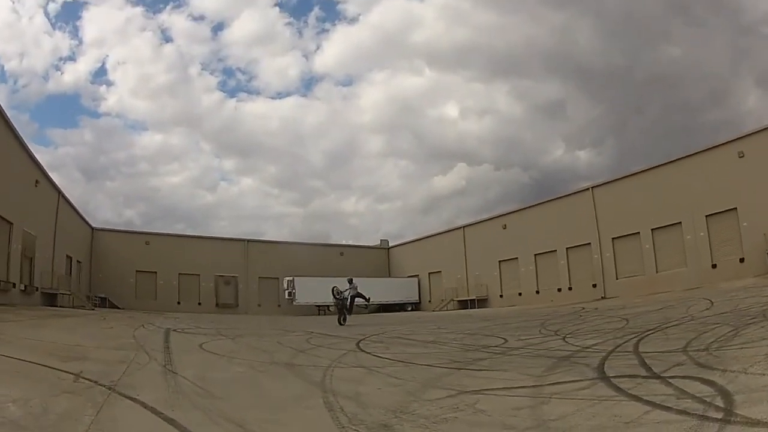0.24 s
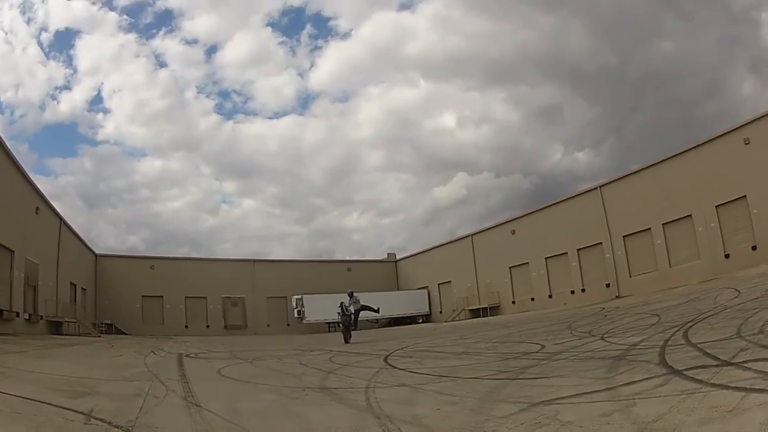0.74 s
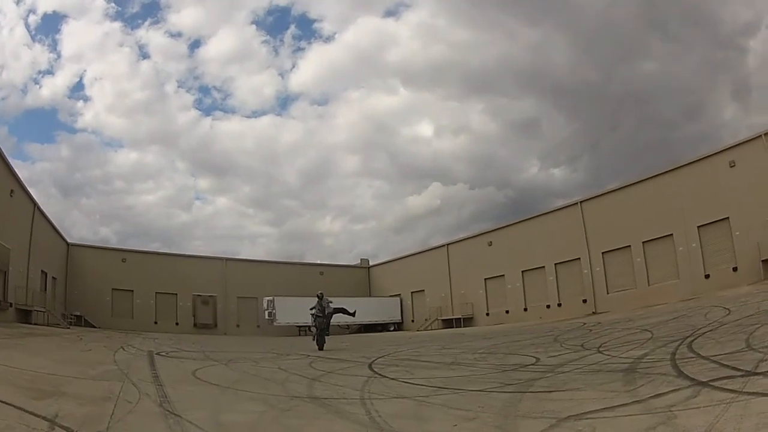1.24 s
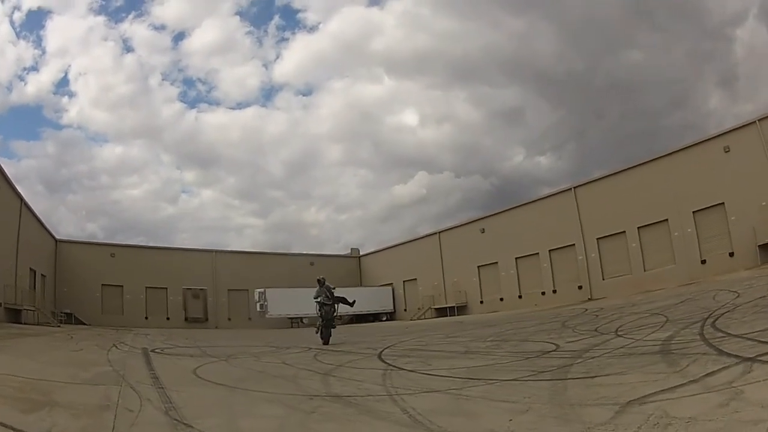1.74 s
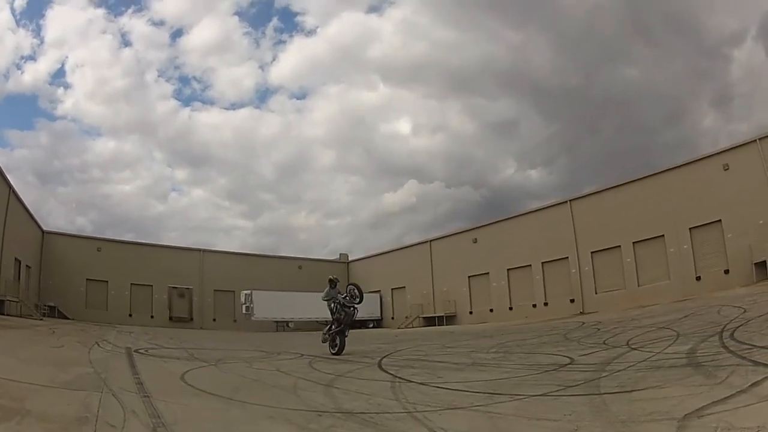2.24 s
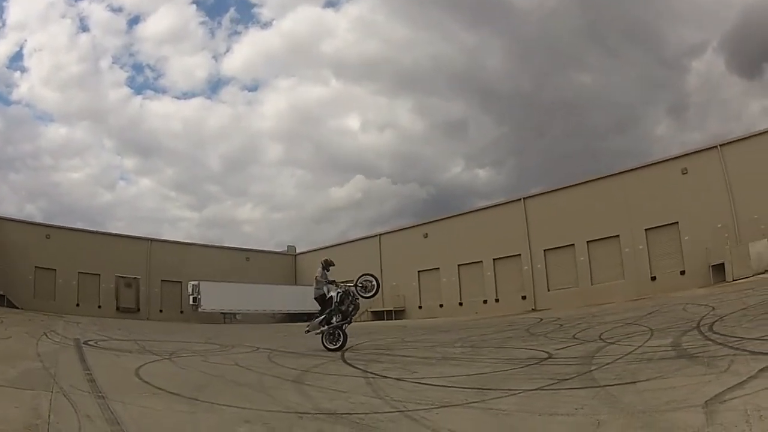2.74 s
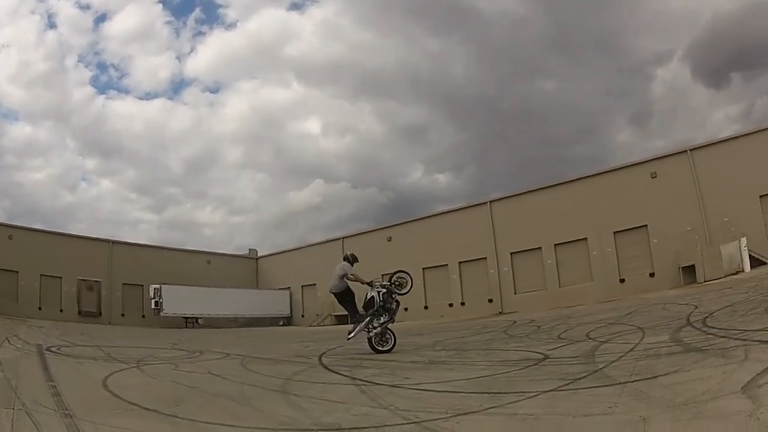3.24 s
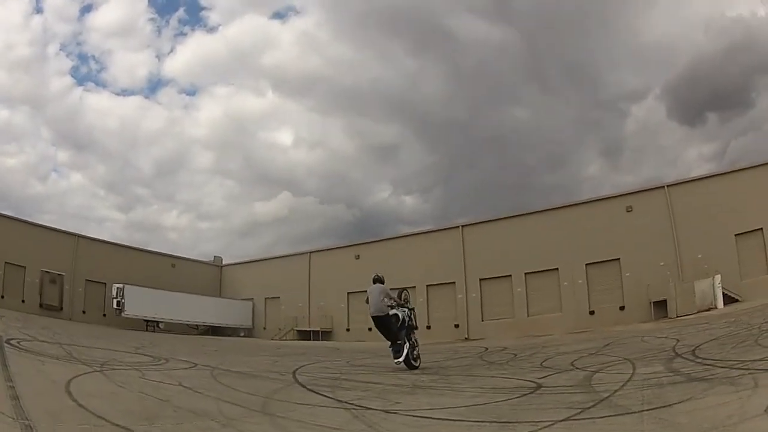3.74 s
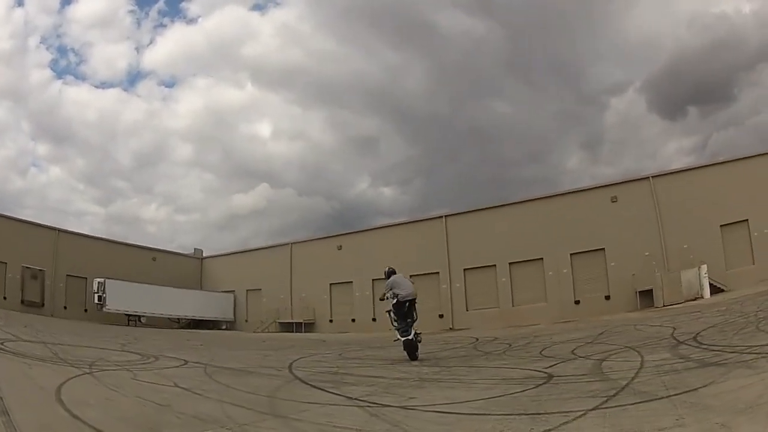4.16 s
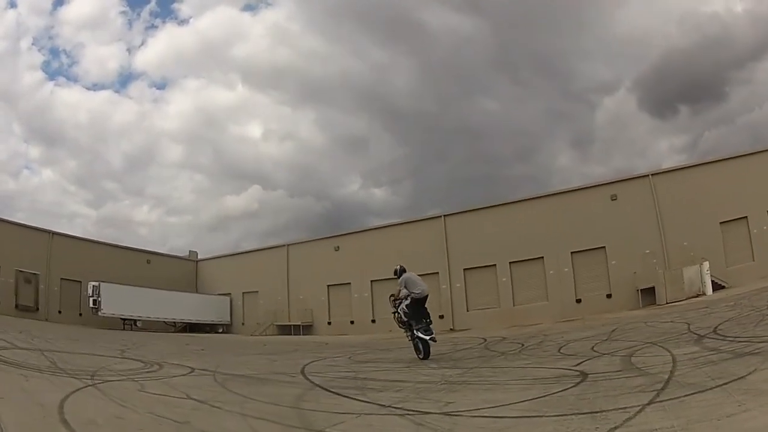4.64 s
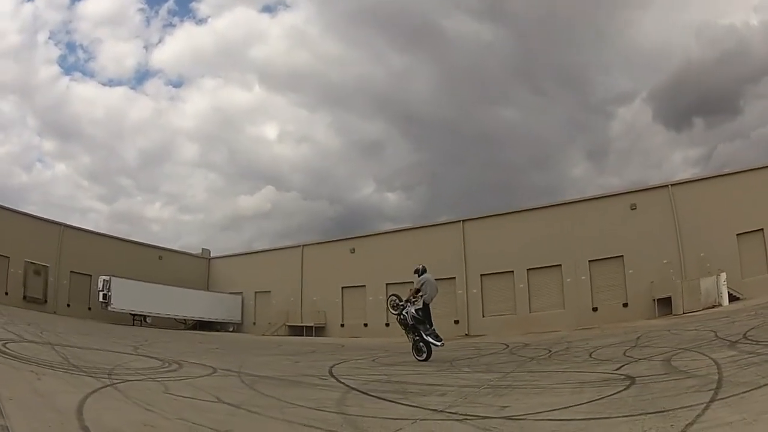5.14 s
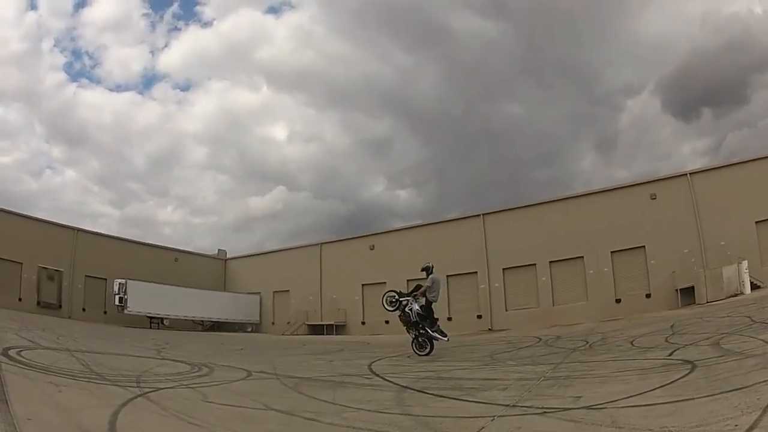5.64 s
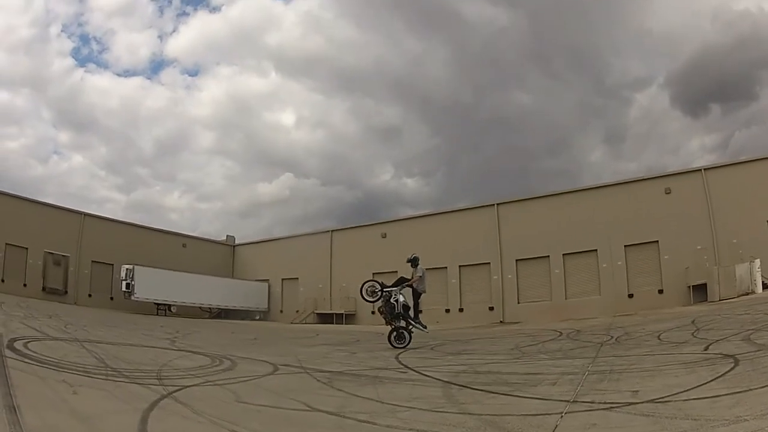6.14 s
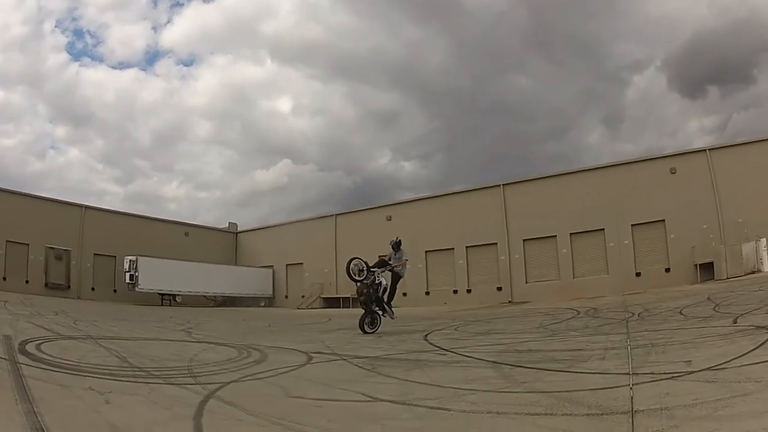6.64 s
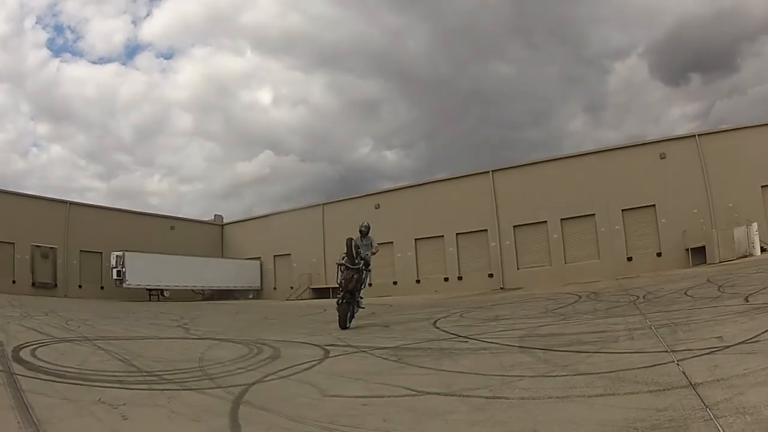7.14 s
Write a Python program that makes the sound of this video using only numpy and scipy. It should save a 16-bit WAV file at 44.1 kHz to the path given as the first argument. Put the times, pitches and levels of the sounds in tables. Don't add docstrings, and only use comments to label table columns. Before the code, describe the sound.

A single-cylinder motorcycle is already running at moderately high revs, its exhaust a fast, low, slightly ragged thump. It sags at once, then climbs from about 0.3 to 1.2 seconds, with shorter blips until another peak near 2.2. Revs drop, and a strong pull from 2.6 to 3.1 brings the loudest, closest bark, briefly clipping around 2.8-2.9. Another blip follows, then a high-revving climb until 4.2. The engine falls to slow, distinct thumps near 4.5, with lower surges around 5.1 and 5.7, a longer rise to 6.5, and short blips to the end near 7.4. Concrete walls return slaps and roughly a second of reverberation. Faint clatter, wavering gear whine and ringing covers accompany steady distant rumble. Tiny grit snaps at 4.8, 5.7, 6.1 and 6.9 are barely noticeable. The encased camera microphone sounds boxy and coarse, with weak treble.

```python
import sys
import numpy as np
from scipy import signal
from scipy.io import wavfile
from scipy.ndimage import uniform_filter1d, minimum_filter1d

SR = 44100
rng = np.random.default_rng(int(sys.argv[2]) if len(sys.argv) > 2 else 0)


def log_audio(samples):
    frames = np.atleast_2d(samples).T
    limited = np.clip(frames, -1, 1)
    pcm = np.round(limited * 32767).astype(np.int16)
    wavfile.write(sys.argv[1], SR, pcm)


def volts_from_db(level):
    exponent = np.asarray(level, float) / 20
    return 10 ** exponent


N = 326340
T = np.arange(N) / SR


def evened(x):
    return x / np.sqrt(np.mean(x ** 2) + 1e-20)


def steady(x, size=6000):
    power = uniform_filter1d(uniform_filter1d(x ** 2, size), size)
    return x / np.sqrt(abs(power) + 1e-12)


def read(points, hz):
    f, value = np.transpose(points)
    return np.interp(np.log(hz + 1), np.log(f + 1), value)


def columns(rows):
    s, *rest = np.transpose(rows)
    return [np.interp(T, s, c) for c in rest]


def colour(x, points, lag=1):
    hz = abs(np.fft.fftfreq(16384, 1 / SR))
    gain = np.log(volts_from_db(np.maximum(read(points, hz), -100)))
    phase = -lag * signal.hilbert(gain).imag
    taps = np.fft.ifft(np.exp(gain + 1j * phase)).real
    return signal.oaconvolve(x, np.roll(taps, 8192))[8192:][:N]


def whistle(hz, width):
    r = np.exp(-np.pi * width / SR)
    noise = rng.standard_normal(N) + 1j * rng.standard_normal(N)
    slow = signal.lfilter([1], [1, -r], noise)
    return evened((slow * np.exp(2j * np.pi * np.cumsum(hz) / SR)).real)


def beating(db):
    rates_hz = np.geomspace(5 / 4, 5 * 1.7, num=12)
    return db * evened(sum(np.sin(2 * np.pi * (f * T + rng.random())) for f in rates_hz))


# hz, level_db (per Hz)
ROAD_SPECTRUM = [(8, -74), (30, -26.5), (55, -7), (100, -5), (200, -4), (380, -8), (480, -22.5), (800, -22),
                 (1200, -74)]


def rumble():
    return volts_from_db(-23.5) * evened(colour(rng.standard_normal(N), ROAD_SPECTRUM))


# delay_s, level_db
WALL_SLAPS = [(.045, -13.5), (0.089, -11), (.15, -5), (0.223, -5)]
# hz, t60_s
YARD_DECAY = [(60, 0.88), (200, 1), (500, 0.75), (2000, 0.65)]


def yard(x):
    out = np.zeros(N)
    source = x - x[0] * np.exp(-T / .01)
    for delay, db in WALL_SLAPS:
        wander_s = 0.00313 * (1 + np.sin(2 * np.pi * (rng.uniform(0.0944, 0.26) * T + rng.random())))
        out += volts_from_db(db) * np.interp(T - delay - wander_s, T, source)
    for k in range(3):
        taps = np.zeros(SR)
        at = np.arange(1500, SR - 20, 20)
        taps[at + rng.integers(0, 20, len(at))] = rng.choice([-1., 1.], len(at))
        hz, t, z = signal.stft(taps, SR, nperseg=1024)
        fade = volts_from_db(-60 * t / read(YARD_DECAY, hz)[:, None])
        tail = signal.istft(z * fade, SR, nperseg=1024)[1]
        turn = np.sqrt(2 / 3) * np.cos(np.pi * (0.707 * T + k / 3))
        out += volts_from_db(-0.5) * signal.oaconvolve(x * turn, tail / np.linalg.norm(tail))[:N]
    return out


# start_s, level_db (peak)
GRIT_SNAPS = [
    (4.8472, -68.5),
    (5.6903, -72),
    (6.1164, -62),
    (6.8997, -61.5),
]


def grit():
    out, t = np.zeros(N), np.arange(500) / SR
    for s, db in GRIT_SNAPS:
        decay = volts_from_db(db + 28.0 - 60 * t / 0.022)
        out[round(s * SR):][:500] += decay * rng.standard_normal(500)
    return colour(out, [(500, -32), (1500, 14), (3000, 9.0), (5500, 1.5), (6000, -25), (7000, -87)])


# start_s, loudness_db, pipe_mouth_turned_db, engine_side_seen_db
CIRCLE_PATH = [(0.06, -21, -2.5, -57), (0.28, -29, -2.5, -56.5), (0.91, -20, 0.0, -54),
               (2.07, -19.5, 5, -50.5), (2.27, -11.5, -4, -48.5), (2.47, -19.5, -1, -53),
               (2.98, -9.5, 0.0, -47.5), (4.32, -14.5, 1, -56), (4.54, -25.5, -1.5, -58.5),
               (5.07, -14.5, -3, -53.5), (5.47, -27.5, -1, -56.5), (5.66, -18.5, -1, -52.5),
               (5.94, -21.5, -5, -54.5), (6.3, -16.5, 7, -52), (6.73, -20, -2, -51), (6.95, -18, 7, -50.5),
               (7.24, -18, -1, -51), (7.34, -18, 9, -46.5)]


def circling():
    return columns(CIRCLE_PATH)


# hz, level_db (per Hz)
CASE_SPECTRUM = [(530, -5), (900, -2.5), (1080, -7.5), (1180, -6.5), (2280, -10), (2730, -22.5),
                 (2840, -17), (4140, -24), (5160, -27), (5900, -36), (7670, -74), (13000, -120)]


def casing_clatter(turns):
    seen = circling()[2]
    side = seen - seen.mean()
    pulse = 1 + 0.64 * np.exp(-(turns % 1) / 0.36)
    noise = colour(rng.standard_normal(N) * pulse, CASE_SPECTRUM)
    dull = signal.sosfiltfilt(signal.butter(4, 2650, fs=SR, output="sos"), noise)
    bright = noise - dull
    return volts_from_db(-42.5 + 0.093 * side) * evened(dull) + volts_from_db(-0.14 + seen) * evened(bright)


# teeth_per_firing, level_db, width_hz
GEAR_TEETH = [(43.5, 6, 68), (22.97, 6, 130)]
# hz, level_db
WHINE_SPECTRUM = [(1200, -16), (1800, 1), (2600, -5), (3000, 6), (3600, 2.5), (4000, -12.5), (5000, -30)]
# start_s, level_db
COVER_TURN = [(0, -1), (1.9, -4.5), (2.2, 4), (2.6, -5.5), (3.6, 5), (3.8, -15), (5.6, -1.5), (6.2, -2),
              (6.5, 3), (6.8, -10), (7.4, 9)]
# delay_s, level_db
FAR_WALLS = [(.16, -5), (.31, -7)]


def gear_whine(hz):
    teeth = sum(volts_from_db(db) * whistle(count * hz, width) for count, db, width in GEAR_TEETH)
    speed_db = 0.0445 * (hz - hz.mean())
    level_db = -65 + columns(COVER_TURN)[0] + speed_db + beating(2)
    whine = volts_from_db(level_db) * colour(teeth, WHINE_SPECTRUM)
    late = sum(volts_from_db(db) * np.interp(T - delay, T, whine) for delay, db in FAR_WALLS)
    return whine + late


# pitch_hz, level_db, width_hz
COVER_MODES = [(2910, -8.5, 190), (3380, -8.5, 16), (2124, -0.5, 75)]


def cover_ring():
    seen = circling()[2]
    ring = sum(volts_from_db(db) * whistle(np.full(N, f), width) for f, db, width in COVER_MODES)
    return volts_from_db(-58 + .3 * (seen - seen.mean())) * ring


# opened_s, low_hz (firings per s there), shut_s, top_hz (firings per s there),
# snap (0-1, early part of the climb)
THROTTLE_BLIPS = [(-0.2, 70, 0.0, 75.5, 0), (0.29, 53, 1.18, 83.8, .3), (1.43, 69, 1.62, 81, 0),
                  (1.63, 80.6, 1.77, 80.7, 0), (1.87, 73.3, 2.18, 87.3, .1), (2.56, 51, 3.11, 84.5, .15),
                  (3.34, 71.7, 3.58, 81, 0), (3.71, 80.7, 4.2, 90, .6), (4.53, 44.5, 4.61, 50.5, 0),
                  (4.78, 49.8, 5.14, 64.8, 1), (5.4, 44.6, 5.73, 64.3, 1), (5.82, 52.6, 5.91, 53.6, 0),
                  (5.92, 54.3, 6.0, 60.6, 0), (6.06, 61.6, 6.46, 81.5, 0), (6.69, 53.8, 6.78, 54.6, 0),
                  (6.79, 55.5, 6.94, 67, .6), (7.05, 60.5, 7.13, 62, 0), (7.23, 58.5, 7.36, 67, 0),
                  (7.45, 61.5, 7.6, 66, 0)]
BLIP_PULL = [5.5, 0.8, -1.2, -1.3, -1, -3.5, -0.5, -0.5, 4, -2.5, -0.5, 1.5, 0.5, -3.5, -2, -5.3, -2.5, -6,
             .1]


def throttle():
    flywheel_s, drop_snap = .04, .2
    shut_db, run_on_s, gas_lag_s = -3, 0.05, 0.068
    opened, low_hz, shut, top_hz, snap = np.transpose(THROTTLE_BLIPS)
    s = np.ravel([opened, shut], order="F")
    ends_hz = np.ravel([low_hz, top_hz], order="F")
    step = np.searchsorted(s, T, side="right") - 1
    is_open = step % 2 == 0
    part = (T - s[step]) / np.diff(s)[step]
    part = part + np.where(is_open, snap[step // 2], drop_snap) * part * (1 - part)
    hz = ends_hz[step] + np.diff(ends_hz)[step] * part
    pull = np.where(is_open, np.array(BLIP_PULL)[step // 2], shut_db)
    pull = np.interp(T - run_on_s, T, pull)
    r = np.exp(-1 / (gas_lag_s * SR))
    pull = signal.lfilter([1 - r], [1, -r], pull - BLIP_PULL[0]) + BLIP_PULL[0]
    return uniform_filter1d(hz, round(flywheel_s * SR)), pull


def firings(turns, uneven_db, late_s):
    fired = np.flatnonzero(np.diff(np.floor(turns)))
    chance = rng.standard_normal((len(fired), 2))
    at = fired + (late_s * SR * chance[:, 0]).astype(int)
    pulses = np.zeros(N)
    pulses[np.clip(at, 0, N - 1)] = volts_from_db(uneven_db * chance[:, 1])
    return pulses


def firing_hum(turns, hz):
    loud = circling()[0]
    level_db = -25.5 + 0.5 * (loud - loud.mean()) - .08 * (hz - hz.mean()) + beating(1.5)
    low = np.sqrt(2) * volts_from_db(level_db) * np.cos(2 * np.pi * (turns + .02))
    return low + volts_from_db(-8) * yard(low)


# hz, level_db
SILENCER = [(15, -100), (50, -62.5), (90, 2), (115, 19), (140, 17.5), (165, 1.5), (195, -0.5), (300, -77)]
# hz, level_db
PIPE = [(110, -21.5), (195, -14.5), (252, 4.5), (286, -1), (323, 1), (400, -0.5), (480, -29.5),
        (610, -93.5), (1030, -120)]
# hz, level_db
UPPER_PIPE = [(280, -51), (470, 0.5), (578, 2.5), (712, -3), (823, -28), (900, -41), (1170, -61.5),
              (1980, -120)]


def exhaust(turns, hz, pull):
    loud, turned, _ = circling()
    near = loud - loud.mean()
    over_revs_db = 0.9 * np.maximum(hz - 79.8, 0)
    boom_db = loud.mean() + 0.9 * near + 0.5 + .4 * pull - .5 * turned + beating(1) - over_revs_db
    pipe_db = loud + 0.65 + 0.77 * pull + .5 * turned
    bark_db = loud - 16 + 1.4 * pull + 0.85 * turned
    even = firings(turns, 1.1, .00008)
    ragged = firings(turns, 1.2, .00007)
    even = signal.lfilter(*signal.butter(1, 220, "high", fs=SR), even)
    boom = volts_from_db(boom_db) * steady(colour(even, SILENCER, .1))
    pipe = volts_from_db(pipe_db) * steady(colour(even, PIPE, .03))
    bark = volts_from_db(bark_db) * steady(colour(ragged, UPPER_PIPE, .05))
    echo = volts_from_db(-6 - 0.1 * (near + pull))
    wet = yard(volts_from_db(1.5) * boom + volts_from_db(-3) * pipe + volts_from_db(4.5) * bark)
    return (boom + pipe + bark + echo * wet) / np.sqrt(1 + echo ** 2)


# start_s, level_db (over full scale)
SURGES = [
    (2.791, 1.2),
    (2.806, 1),
    (2.920, 1.1),
    (2.934, .8),
]


def levelled(x):
    room_db = -20 * np.log10(abs(x) + 1e-9)
    gain_db = uniform_filter1d(np.minimum(minimum_filter1d(room_db - .6, 900), 0), 600)
    for s, db in SURGES:
        at = round(s * SR)
        peak_db = 20 * np.log10(x[at - 130:at + 130].max())
        surge_db = db - peak_db - gain_db[at]
        upward = .5 + .5 * np.tanh(2 * x + .8)
        gain_db = gain_db + surge_db * np.exp(-((T - s) / .005) ** 4) * upward
    return x * volts_from_db(gain_db)


def scene():
    hz, pull = throttle()
    turns = np.cumsum(hz) / SR
    turns -= turns[round(SURGES[0][0] * SR)] % 1
    mechanics = casing_clatter(turns) + gear_whine(hz) + cover_ring()
    engine = firing_hum(turns, hz) + exhaust(turns, hz, pull)
    return (rumble() + grit() + mechanics + engine)[None]


def roll_off(x):
    return signal.sosfilt(signal.butter(12, 15920, fs=SR, output="sos"), x)


def record(dry):
    coupled = signal.sosfilt(signal.butter(2, 15, "high", fs=SR, output="sos"), dry)
    slow = signal.resample_poly(levelled(coupled[0])[None], 40, 147, axis=1)
    held = signal.resample_poly(np.repeat(slow, 4, axis=1), 147, 160, axis=1)
    held = np.pad(held, ((0, 0), (0, 8)))[:, :N]
    band_limit = signal.firwin(255, 15400, window=("kaiser", 9), fs=SR)[None]
    mix = signal.oaconvolve(np.clip(held, -1, 1), band_limit, "same")
    return roll_off(mix)


dry = scene()
out = record(dry)
log_audio(out)
```